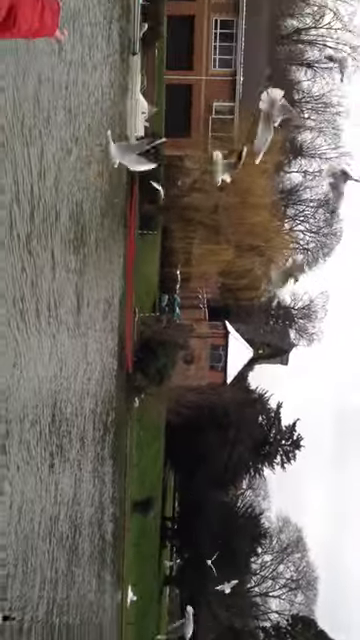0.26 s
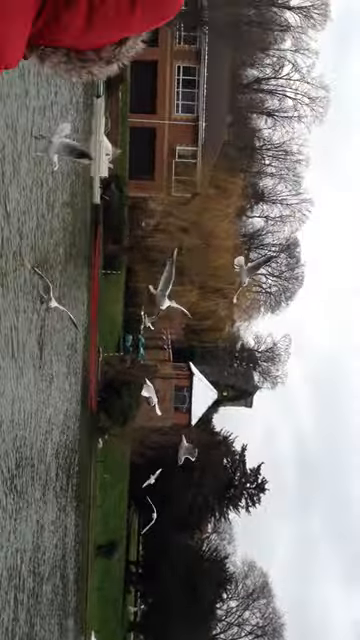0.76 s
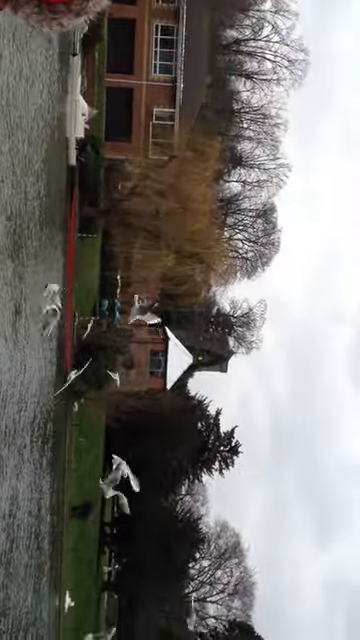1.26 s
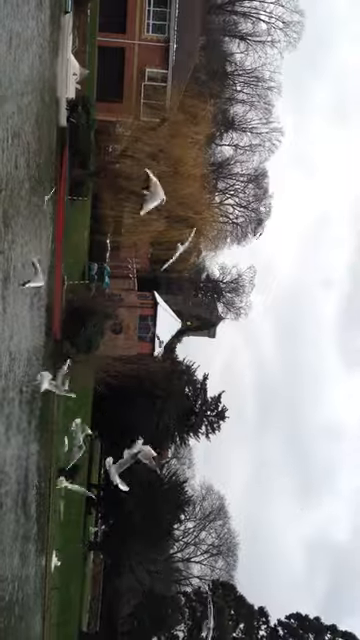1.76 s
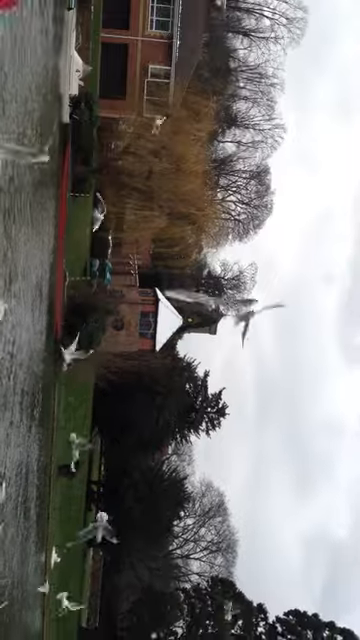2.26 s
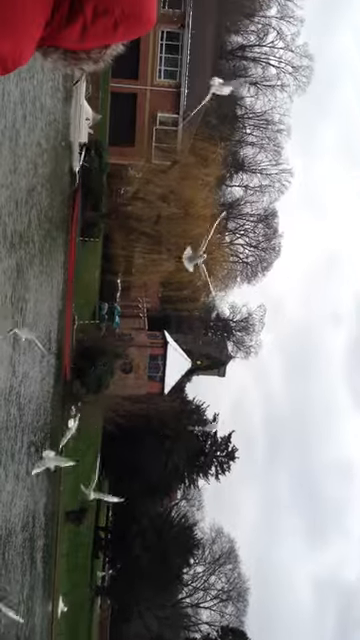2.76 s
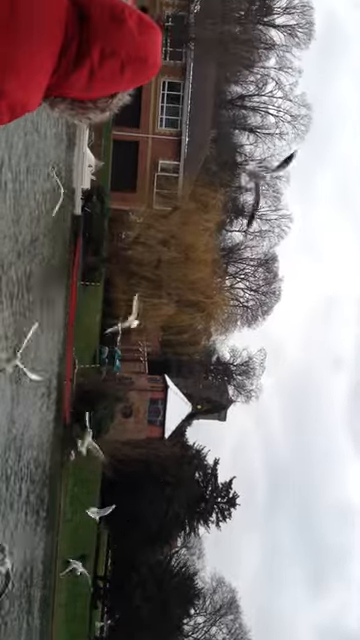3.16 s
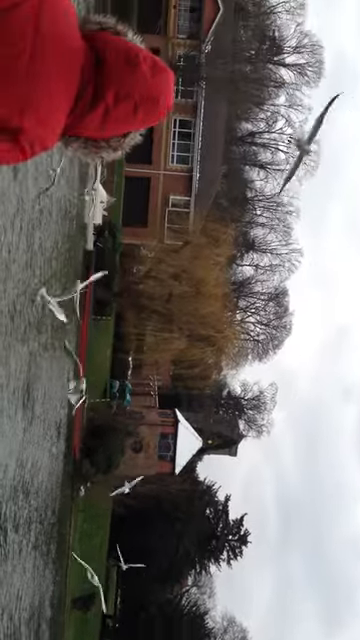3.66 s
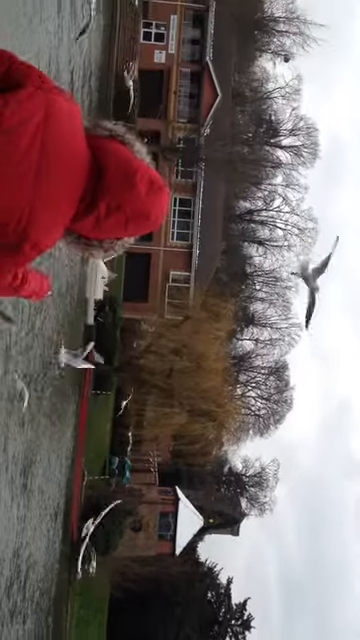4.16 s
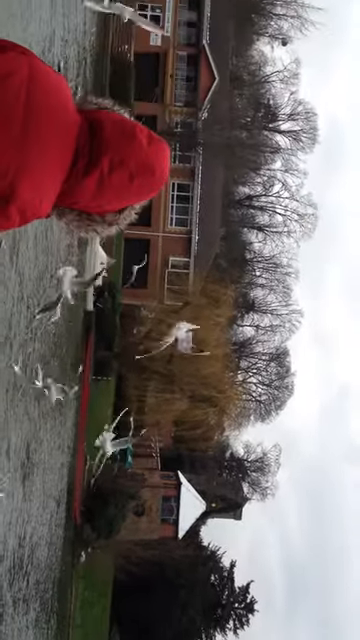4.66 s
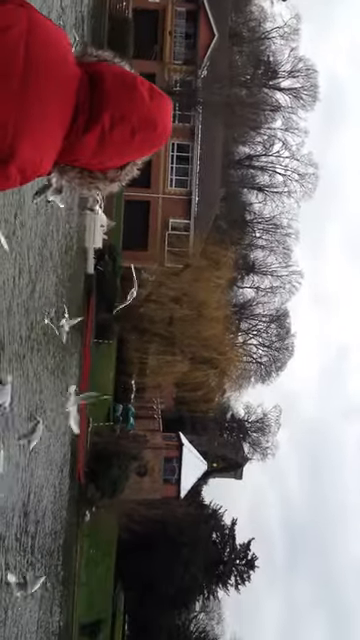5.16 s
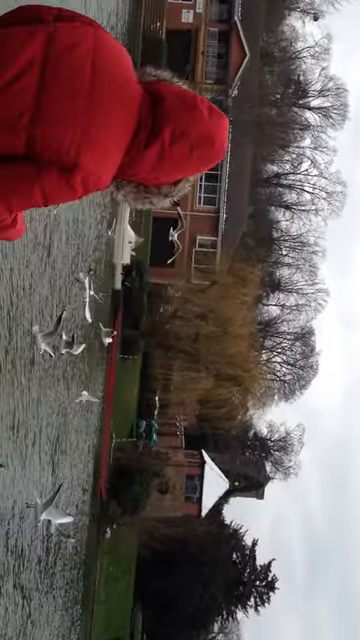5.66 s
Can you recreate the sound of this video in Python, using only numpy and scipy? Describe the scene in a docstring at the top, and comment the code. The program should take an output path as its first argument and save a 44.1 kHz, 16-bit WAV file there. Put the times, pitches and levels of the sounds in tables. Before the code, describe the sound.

Gulls call close to a small microphone beside a lake, their short cries clear or rasping, often trilled and overlapping. Wind rumbles and thumps on the microphone at the start, with a brief hiss and a few faint ticks, then returns in lighter gusts. From about halfway the calls crowd together and a few flip into high screams. Farther gulls and a soft outdoor wash lie behind.

```python
"""Gulls cry close by as a flock wheels over a lake, and a gusty breeze buffets a small microphone.
Each cry follows the source-filter principle: an arched train of syrinx pulses, clear or rasping and
often chopped by a fast trill, rings in the windpipe and beak. A few cries flip up into high screams.
The wind is turbulence at the microphone port, rumbling in gusts and thumping in single eddies.
Behind lie farther gulls, a faint echo from the bank, a soft wash and, early on, a hiss and a few ticks."""
import sys
import numpy as np
from scipy import signal
from scipy.fft import rfft, irfft
from scipy.io import wavfile
from scipy.ndimage import map_coordinates

SR = 44100
rng = np.random.default_rng(int(sys.argv[2]) if len(sys.argv) > 2 else 0)


def transcribe(u):
    """Save the signal u as a 16-bit wav file named by the first command-line argument.

    u: samples, shape (n,) or (channels, n), limited to [-1, 1]; the rate is SR.
    q: integer samples, one column per channel.
    """
    v = np.clip(np.atleast_2d(u).T, -1, 1)
    q = np.round(v * 32767).astype(np.int16)
    wavfile.write(sys.argv[1], SR, q)


N = 261411


def gain_of(db):
    """Amplitude ratio: a factor of ten for every 20 dB."""
    return 10 ** (np.asarray(db) / 20)


def unit_rms(x):
    """Normalisation to an rms of one."""
    return x / np.sqrt(np.mean(x ** 2) + 1e-20)


def value_at(points, hz):
    """Interpolation on a log-frequency axis."""
    frequencies, values = np.transpose(points)
    return np.interp(np.log(hz + 1), np.log(frequencies + 1), values)


def add(mix, start_s, sound):
    """Superposition: a sound joins the mix at its start time."""
    part = mix[max(round(start_s * SR), 0):][:len(sound)]
    part += sound[:len(part)]


def noise(spectrum):
    """Spectral shaping: white noise takes on a colour, at unit rms."""
    gains = gain_of(value_at(spectrum, np.fft.rfftfreq(N, 1 / SR)))
    return unit_rms(irfft(rfft(rng.standard_normal(N)) * gains, N))


def wander(length, rate_hz):
    """Random modulation: a continuous drift of about unit size."""
    steps = rng.standard_normal(4096)
    return np.interp(np.arange(length) * rate_hz / SR, np.arange(len(steps)), steps)


def hold(start, length, rise_s, fall_s):
    """An envelope of linear attack, sustain and exponential decay."""
    t = np.arange(N) / SR - start
    return np.clip(t / rise_s, 0, 1) * np.exp(-np.maximum(t - length, 0) / fall_s)


def resonate(x, hz, width_hz):
    """A damped resonance of unit gain whose centre follows the curve hz."""
    carrier = np.exp(2j * np.pi * np.cumsum(hz) / SR)
    pole = np.exp(-np.pi * width_hz / SR)
    return 2 * (carrier * signal.lfilter([1 - pole], [1, -pole], x / carrier)).real


# The spectrum of the wash. Each row: frequency in Hz, relative level in dB.
WASH_SPECTRUM = [(250, -36), (420, 3.5), (600, 4), (1050, 3), (1600, -3.5), (2500, -11.5), (3600, -12),
                 (5000, -16), (7500, -15), (10000, -22), (12500, -15), (15500, -20)]


def lakeside_wash(level_db=-52.7):
    """Amplitude-modulated noise: the soft, wavering wash of the open lakeside."""
    return gain_of(level_db + 3.7 * wander(N, 25)) * noise(WASH_SPECTRUM)


# The spectrum of the hiss. Each row: frequency in Hz, relative level in dB.
HISS_SPECTRUM = [(500, 6), (1500, -9), (4000, 0), (7000, 4.5), (10000, 0), (12500, 3.5), (15500, 0.5)]


def early_hiss(level_db=-42.5, fade_db_per_s=15):
    """Exponential decay: a bright, flickering hiss fades slowly, then dies quickly."""
    fading = gain_of(level_db - fade_db_per_s * np.arange(N) / SR + 2.2 * wander(N, 250))
    return fading * hold(0, length=.755, rise_s=1 / SR, fall_s=.063) * noise(HISS_SPECTRUM)


# Faint sharp ticks. Each row: start in seconds, initial level in dB.
TICK_EVENTS = [(0.148, -30), (0.208, -37), (0.319, -33)]


def ticks(decay_s=.00086):
    """Broadband transients: very short bursts of noise are heard as ticks."""
    out = np.zeros(N)
    t = np.arange(SR // 50) / SR
    for start, db in TICK_EVENTS:
        add(out, start, gain_of(db) * rng.standard_normal(len(t)) * np.exp(-t / decay_s))
    return out


# The spectrum of the turbulence. Each row: frequency in Hz, relative level in dB.
RUMBLE_SPECTRUM = [(20, -58), (40, -28), (70, -15), (100, -6.5), (140, 2), (190, -1), (250, -2.5),
                   (330, -12), (450, -20.5), (700, -31), (1500, -86)]
# Gusts of wind. Each row: start in seconds, length in seconds, level in dB.
WIND_GUSTS = [(0, 0.81, -36), (1.295, 0.11, -46), (1.694, 0.13, -42), (2.353, 0.67, -40.5),
              (3.773, 0.089, -37), (5.327, 0.27, -36), (5.692, 0.29, -37.5)]


def turbulence(breeze_db=-42.5, lumps_db=3.7):
    """Turbulent pressure at the microphone: a lumpy rumble in which breeze and gusts add in power."""
    gusts = [gain_of(db) * hold(start, length, rise_s=.0052, fall_s=.045)
             for start, length, db in WIND_GUSTS]
    strength = np.sqrt(gain_of(breeze_db) ** 2 + np.sum(np.square(gusts), 0))
    return strength * unit_rms(noise(RUMBLE_SPECTRUM) * gain_of(lumps_db * wander(N, 60)))


# Single eddies that strike the microphone. Each row: start in seconds, relative peak level in dB.
EDDY_STRIKES = [(0.117, -20.5), (0.164, -27), (0.281, -24), (0.342, -24.5), (0.422, -22), (0.469, -21),
                (0.57, -24.5), (0.613, -22.5), (0.643, -22), (0.724, -29.5), (2.471, -29), (2.683, -29),
                (2.843, -27.5), (2.939, -27.5), (3.03, -24), (3.066, -19.5), (4.279, -28), (5.155, -29),
                (5.501, -25.5)]


def eddies(thump_hz=184.4, puff_hz=289, puff_width_hz=176, rise_s=.0057):
    """Damped oscillation: each eddy thumps for a few cycles, with a softer puff of air."""
    out = np.zeros(N)
    t = np.arange(SR // 10) / SR
    swell = t / rise_s * np.exp(1 - t / rise_s)
    centre_hz = np.full(len(t), puff_hz)
    for (start, db), phase in zip(EDDY_STRIKES, rng.random(len(EDDY_STRIKES))):
        band = resonate(rng.standard_normal(len(t)), centre_hz, puff_width_hz)
        puff = unit_rms(resonate(band, centre_hz, puff_width_hz))
        thump = np.sin(2 * np.pi * (thump_hz * t + phase))
        add(out, start, gain_of(db - 3) * swell * (thump + gain_of(-9) * puff))
    return out


def microphone_port(pressure, cutoff_hz=52):
    """High-pass filtering: the small port passes no deep bass."""
    return signal.lfilter(*signal.butter(2, cutoff_hz, "high", fs=SR), pressure)


# The decay of the echo. Each row: frequency in Hz, time to fall by 60 dB in seconds.
ECHO_DECAY = [(300, 0.094), (3000, 0.66), (8000, 0.39), (16000, 0.014)]


def bank_echo(x, returns_per_s=2000, path_drift_s=.00016):
    """Scattering from water, walls and trees: many decaying returns, blurred by shifting paths."""
    returns = rng.standard_normal(SR) * (rng.random(SR) < returns_per_s / SR)
    hz, t, spectra = signal.stft(returns, SR, nperseg=256)
    decay = gain_of(-60 * t / value_at(ECHO_DECAY, hz)[:, None])
    tail = signal.istft(spectra * decay, SR, nperseg=256)[1]
    echo = signal.fftconvolve(x, tail / np.linalg.norm(tail))[:N]
    return map_coordinates(echo, [np.arange(N) + path_drift_s * SR * wander(N, 220)])


def side_paths(x, depth, count=4):
    """Comb filtering: short side paths make peaks and notches that shift as the bird flies."""
    n = np.arange(len(x))
    delays = [s * SR * (1 + .035 * wander(len(x), 30)) for s in rng.uniform(.0004, .0025, count)]
    return x + depth * sum((-1) ** k * map_coordinates(x, [n - d]) for k, d in enumerate(delays))


# The response of windpipe and beak. Each row: frequency in Hz, relative gain in dB.
THROAT_RESPONSE = [(410, -83), (700, -5.5), (1090, -15.5), (1250, -9), (1630, -1), (2160, -4.5),
                   (2590, -8.5), (3230, -4), (3540, -5), (4240, -3.5), (5220, -12), (7500, -17),
                   (9850, -28.5), (12900, -23), (15500, -32)]


def throat(x, brightness_db, size=1024):
    """Minimum-phase filtering by windpipe and beak; a gull facing the microphone sounds brighter."""
    hz = abs(np.fft.fftfreq(size, 1 / SR))
    octaves_up = np.log2(np.maximum(hz, 1000) / 1000)
    db = np.maximum(value_at(THROAT_RESPONSE, hz), -50) + brightness_db * octaves_up
    log_response = np.conj(signal.hilbert(np.log(gain_of(db))))
    ring = np.fft.ifft(np.exp(log_response)).real
    return signal.fftconvolve(x, ring)[:len(x)]


def syrinx(hz, rough, jitter=.2, shimmer=.45, doubling=.054):
    """A pulse source, one pulse a cycle; roughness adds jitter, shimmer, period doubling and breath."""
    late, uneven, air = rng.standard_normal((3, 16384))
    cycles = np.cumsum(hz) / SR
    k = np.arange(1, int(cycles[-1]) + 1)
    onsets = np.interp(k, cycles, np.arange(len(hz)))
    pulse_rough = rough[onsets.astype(int)]
    shake = .005 + jitter * pulse_rough ** 2  # even a clear cry has blurred top overtones
    onsets += shake * late[k] * SR / hz.mean()
    height = (1 + shimmer * pulse_rough * uneven[k]) * (1 + doubling * pulse_rough * (-1) ** k)
    nearby = onsets.astype(int)[:, None] + np.arange(-8, 9)
    shapes = height[:, None] * np.sinc(nearby - onsets[:, None])
    pulses = np.zeros(len(hz))
    np.add.at(pulses, np.clip(nearby, 0, len(hz) - 1), shapes)
    puffs = unit_rms(air[:len(hz)] * (1 + np.exp(-(cycles % 1) / .18)))
    return unit_rms(pulses) + (.04 + .6 * rough) * puffs


def cry(crest, length, db, pitch_hz, climb, fall, rough_start, rough_end,
        trill, trill_hz, brightness_db, beak_hz, beak_db):
    """Source and filter: pitch and beak glide together as effort swells; a trill chops the voice."""
    start = crest - .46 * length
    t = np.arange(start, start + length, 1 / SR)
    n = len(t)
    arch = np.interp(t, [start, crest, start + length], [-1, 0, 1])
    beats = trill_hz * (t - crest) + .3 * arch * wander(n, 60)
    gap = np.clip(trill * (1 + .3 * wander(n, 70)), 0, .97) * np.sin(np.pi * beats) ** 4
    taper = min(np.sqrt(.135 / length), 1.5)  # longer cries have flatter tops
    swell = (np.cos(np.pi * arch / 2) + 1e-9) ** taper
    effort = swell * (1 - gap) * gain_of(1.2 * wander(n, 140))
    rough = np.interp(arch, [-1, 1], [rough_start, rough_end])
    rough = np.clip(rough + .16 * arch ** 4, 0, 1)  # rougher at both ends
    bend = 2.4 if climb * fall > 0 else 1  # a cry that only rises or only falls slides straight
    glide = 1 - np.where(arch < 0, climb, fall) * abs(arch) ** bend
    waver = (.0034 + .0441 * rough) * wander(n, 246.1)
    drift = 1 + .055 * rough ** 1.577 * wander(n, 54.63)
    hz = pitch_hz * glide * (1 - .0733 * gap + waver) * drift  # pitch sags between beats
    voice = throat(syrinx(hz, rough), brightness_db)
    voice = side_paths(voice, depth=.1 + .45 * rough.mean())
    beak_drift = 1 + .21 * rough ** 2 * wander(n, 71.5)
    beak = resonate(voice, beak_hz * glide * beak_drift, width_hz=270)
    voice = unit_rms(voice + (gain_of(beak_db) - 1) * beak)
    # A softly driven syrinx closes gently, so the cry is dull at its edges and between beats.
    mellow = signal.filtfilt(*signal.butter(2, 4600, fs=SR), voice)
    sharpness = np.clip(effort, 0, 1) ** .63
    return start, gain_of(db) * effort * (sharpness * voice + (1 - sharpness) * mellow)


def far_gulls(cries_per_s=5, level_db=-60):
    """Attenuation with distance: the rest of the flock is faint and dull, crying hoarsely at random."""
    out = np.zeros(N)
    for when, length, pitch, beak, loud in rng.random((int(cries_per_s * N / SR), 5)):
        add(out, *cry(when * N / SR, length=.067 + .11 * length, db=level_db + 4 * (loud - .5),
                      pitch_hz=750 + 400 * pitch, climb=.149, fall=.333,
                      rough_start=.57, rough_end=.62, trill=.516, trill_hz=74,
                      brightness_db=-6.5, beak_hz=1700 + 2000 * beak, beak_db=5))
    return out


# High screams. Each row: brightness in dB per octave, then a list of points.
# Each point: time in seconds, pitch in Hz, level in dB, how far the voice breaks from 0 to 1.
SCREAM_CONTOURS = [ (10, [(3.135, 2930, -46, .3), (3.178, 3010, -27.5, .1), (3.22, 2970, -39, .4),
                   (3.25, 2890, -34, .3), (3.27, 2420, -32.5, .7), (3.295, 2150, -42, 1)]),
                   (3, [(3.305, 2364, -39, 0.7), (3.325, 2553, -34, 0.5), (3.345, 2470, -31, 0.3),
                   (3.355, 2400, -48, 0.5)]), (-3, [(3.785, 3250, -40, 0.5), (3.795, 3140, -29.5, 0),
                   (3.803, 2980, -36, .02), (3.819, 3140, -32.5, 0.24), (3.83, 2870, -58, .3)]),
                   (1, [(4.195, 2600, -52, 0.3), (4.213, 2650, -47, .2), (4.228, 2710, -39.5, 0),
                   (4.243, 2590, -48, 0.4), (4.262, 2560, -39, .6)])]


def screams(break_hz=99, flutter_db=4.5, breathiness=.29):
    """Nonlinear vibration: a hoarse whistle breaks into chopped steps and gains a half-order tone."""
    out = np.zeros(N)
    for brightness_db, contour in SCREAM_CONTOURS:
        when, pitch, level, breaking = np.transpose(contour)
        t = np.arange(when[0], when[-1], 1 / SR)
        n = len(t)
        broken = np.clip(np.interp(t, when, breaking), 0, 1)
        beats = break_hz * (t - t[-1])
        stepped_time = t + broken * (np.floor(beats) + .5 - beats) / break_hz
        rasp = (.11 + .3 * broken) * wander(n, 2200)
        hz = np.interp(stepped_time, when, pitch) * (1 + (.008 + .03 * broken) * wander(n, 260))
        phase = 2 * np.pi * np.cumsum(hz) / SR + rasp
        tones = sum(np.cos(k * phase) / k for k in range(1, 4)) + .6 * broken * np.cos(1.5 * phase)
        source = unit_rms(tones) + breathiness * rng.standard_normal(n)
        voice = unit_rms(throat(source, brightness_db))
        effort = signal.windows.tukey(n, .1) * (1 - .8 * broken * np.cos(np.pi * beats) ** 4)
        db = np.interp(t, when, level) + flutter_db * wander(n, 145)
        add(out, when[0], effort * gain_of(db) * voice)
    return out


# Close cries, or loud beats within a cry. Each row: crest time in seconds, length in seconds,
# level in dB, pitch in Hz, climb before the crest and fall after it as shares of the pitch (negative
# for the other way), roughness at the start and at the end from 0 to 1, trill depth from 0 to 1,
# trill rate in Hz, brightness in dB per octave, beak resonance in Hz, its boost in dB.
NEAR_CRIES = [ (.08, 0.059, -25.5, 993, 0.17, -0.0044, 0.64, 0.37, 0.0083, 85, 4.5, 2810, 13),
              (.096, 0.019, -24.5, 949, -.03, 0.12, .02, .02, 0, 85, 1.5, 2880, 11),
              (.108, 0.032, -35, 789, -0.13, 0.11, 0.42, 0.37, 0.24, 85, 7, 1550, 4.4),
              (.432, .085, -27.5, 1010, .25, .25, .15, .35, .8, 88, 3.5, 3050, 8),
              (.595, .054, -47.5, 773, .14, 0.079, 0.62, 0.42, 0.055, 76, 1.5, 2600, 13),
              (.775, 0.074, -36.5, 1126, 0.039, .38, 0.44, 0.51, 0.24, 76, 0.5, 2090, 3.4),
              (.97, 0.072, -24.5, 1093, .25, -0.022, 0.61, .02, 0.083, 87, 0.5, 3240, 6.5),
              (.982, .014, -26, 1070, 0.05, 0.15, .05, .05, 0, 87, 4, 3220, 9.3),
              (.994, 0.049, -28, 1025, -0.076, 0.2, .02, 0.45, 0.65, 87, 2, 3090, 6),
              (1.039, .021, -23.5, 1030, .1, .17, .1, .14, 0, 76, 1.5, 3080, 4),
              (1.061, 0.033, -38.5, 748, -0.19, 0.17, 0.65, .55, 0.25, 76, 4, 1480, 14),
              (1.117, 0.25, -36, 1052, 0.14, 0.0072, 0.3, 0.51, 0.4, 76, 3, 1090, 21.4),
              (1.206, 0.082, -33.5, 1078, 0.049, -0.041, 0.32, 0.8, 0.37, 76, 6.5, 3180, 18),
              (1.23, 0.047, -29.5, 975, 0.0098, 0.3, 0.34, 0.44, 0.23, 85, 0.5, 1770, 3.5),
              (1.265, .09, -42, 830, -.1, .16, .75, .8, .75, 72, -3, 1650, 10),
              (1.352, 0.066, -33.5, 980, 0.16, 0.35, 0.21, .25, 0.57, 70, 1, 2870, 9.1),
              (1.443, 0.073, -44, 776, .14, 0.41, 0.24, 0.56, 0.28, 76, -5, 1530, 6.2),
              (1.513, 0.053, -48, 895, 0.23, 0.19, 0.64, 0.59, 0, 76, -5, 2700, 5.5),
              (1.556, 0.078, -35, 1055, .13, 0.099, 0.45, 0.57, 0.43, 76, 3, 3430, 4.7),
              (1.686, .074, -23.5, 1135, .05, .32, .08, .2, .2, 76, .5, 3380, 8),
              (1.801, 0.058, -41, 806, 0.15, 0.37, 0.52, 0.51, 0.42, 76, 0, 3500, 6),
              (2.041, .24, -39, 1089, 0.065, .16, 0.7, 0.76, 0.056, 76, 2.5, 3400, 8.9),
              (2.362, 0.074, -35, 747, .09, .36, 0.43, .5, 0.15, 76, 3.5, 2220, 6.8),
              (2.755, .07, -49, 830, .12, .15, .35, .4, .2, 76, -4, 2500, 14),
              (2.885, 0.063, -33.5, 642, 0.16, 0.084, 0.42, 0.54, 0.013, 76, 4.5, 3200, 5),
              (3.113, 0.13, -31, 1091, 0.22, 0.17, 0.83, 0.62, 0, 76, 3.5, 3580, 4.7),
              (3.195, .2, -35, 1115, .06, .12, .6, .65, .3, 76, 3.5, 4200, 8),
              (3.277, .04, -34, 1190, -.08, .14, .2, .3, .7, 90, .5, 3560, 8),
              (3.348, 0.019, -33, 1220, 0.09, 0.3, 0.37, 0.34, 0.3, 76, 3, 3160, 15),
              (3.366, 0.22, -39, 1001, -0.074, 0.25, 0.57, 0.57, 0.091, 76, 3.5, 2040, 3.8),
              (3.471, .072, -28, 590, .2, .18, .25, .3, .3, 76, 3, 3540, 6),
              (3.585, 0.077, -34, 740, 0.19, -0.16, 0.083, 0.45, 0.21, 76, 4, 3600, 3.6),
              (3.619, 0.079, -31, 1119, 0.15, 0.22, 0.57, 0.7, 0.25, 76, 3, 3500, 12),
              (3.69, 0.068, -33.5, 990, -0.0035, 0.22, .25, 0.56, 0.67, 70, 4.5, 4950, 11),
              (3.757, 0.097, -34, 1080, 0.11, -0.012, 0.71, 0.26, 0.022, 76, 1, 2200, 5.3),
              (3.782, 0.064, -32, 1090, 0.11, 0.17, 0.88, 0.54, 0.23, 76, 2.5, 3860, 9.6),
              (3.835, 0.037, -44.5, 970, -0.11, 0.12, .6, 0.71, 0, 76, 0.5, 2090, 6.8),
              (3.881, 0.12, -40, 1056, 0.14, 0.11, 0.83, 0.89, 0.29, 76, 4, 4300, 3.1),
              (3.949, 0.074, -36.5, 1095, 0.13, 0.27, 0.54, 0.57, 0.14, 76, -1, 3300, 8.1),
              (4.084, 0.07, -32.5, 776, 0.18, -.06, .03, 0.66, 0.22, 76, 4.5, 3940, 7.8),
              (4.107, 0.066, -37, 954, -0.087, 0.037, 0.62, 0.64, 0.37, 76, 3, 1880, 3.5),
              (4.145, 0.038, -36, 994, 0.15, .1, 0.49, .3, 0.03, 76, 1, 2000, 3.7),
              (4.159, 0.053, -35.5, 977, 0.1, 0.5, .3, 0.48, 1, 76, 2.5, 2920, 4.8),
              (4.243, 0.067, -42, 1282, 0.15, 0.17, 0.42, 0.44, 0.32, 76, 3, 3900, 4.7),
              (4.269, 0.021, -23, 1058, 0.086, 0.068, 0.37, 0.2, 0, 90, 0, 3150, 9.6),
              (4.281, 0.017, -24, 1059, 0.041, -0.05, .1, 0.17, 0.23, 90, -0.5, 3180, 5),
              (4.292, 0.019, -26, 1150, -0.0056, -0.014, .15, .15, 0, 90, 1.5, 2280, 4),
              (4.301, 0.023, -24, 1067, -0.0032, 0.14, .1, 0.49, 0, 90, 0.5, 2110, 4.7),
              (4.33, 0.066, -31, 1182, .16, .3, 0.38, 0.48, 0.5, 90, 2, 3630, 4.1),
              (4.543, 0.07, -47, 668, 0.14, 0.36, 0.644, 0.68, 0, 76, -4.5, 2000, 5.4),
              (4.664, 0.061, -35, 1054, .13, 0.065, .35, 0.47, 0.82, 76, -0.5, 3100, 2),
              (4.694, .066, -32.5, 866, .09, .24, .4, .5, .7, 72, 3, 2460, 6),
              (4.737, 0.066, -32, 965, -0.067, 0.0078, .2, 0.19, 0, 76, 4, 3840, 8.4),
              (4.757, 0.053, -38.5, 1105, 0.097, 0.48, 0.51, 0.65, 0.34, 76, 1.5, 4000, 6.6),
              (4.817, .1, -35, 778, .1, -.12, .55, .65, .58, 66, 1, 2120, 8),
              (4.873, .07, -38, 756, .1, -.08, .55, .6, .5, 72, -1.5, 2300, 8),
              (4.926, 0.075, -29, 1016, 0.13, 0.29, 0.43, 0.38, 0.29, 72, 3.5, 3980, 10),
              (4.941, 0.024, -21.5, 1100, 0.066, 0.1, 0.09, .1, 0, 75, 0, 3340, 7.6),
              (4.954, 0.084, -23.5, 1098, 0.11, 0.44, 0.082, 0.18, 0.81, 75, 3, 3370, 4.1),
              (4.998, 0.21, -32.5, 1157, 0.018, 0.2, 0.73, 0.71, 0.45, 70, 3, 3540, 7.8),
              (5.033, 0.015, -28, 1237, 0.11, .04, 0.28, 0.24, 0, 88, 0, 3740, 5.2),
              (5.045, 0.041, -26, 1262, 0.0074, .1, 0.2, 0.57, 0.63, 88, 3.5, 4180, 6.9),
              (5.168, 0.069, -34.5, 954, .2, -0.11, 0.27, 0.22, 0, 76, 5.5, 3940, 9),
              (5.185, 0.023, -26.5, 983, 0.073, -0.021, .04, .04, 0.15, 64, 6, 4080, 11),
              (5.201, 0.056, -32, 1011, -0.024, 0.14, 0.21, 0.44, 0.4, 64, 2, 4100, 4.6),
              (5.395, 0.099, -30.5, 1039, 0.23, 0.36, 0.69, 0.39, 0.78, 73, 2.5, 1880, 9),
              (5.461, 0.14, -44, 685, 0.062, 0.12, 0.54, 0.72, 0.64, 70, 1, 3400, 2.8),
              (5.657, 0.057, -36.5, 799, 0.082, 0.065, 0.53, 0.51, 0.42, 76, 1.5, 2250, 6.6),
              (5.81, 0.077, -31, 770, 0.16, 0.24, 0.33, 0.47, 0.33, 70, 2.5, 2330, 7.1)]


def near_gulls(reflection_db=-16):
    """Specular reflection: the water mirrors each close cry a few milliseconds later."""
    out = np.zeros(N)
    delays_s = rng.uniform(.002, .008, len(NEAR_CRIES))
    for row, delay in zip(NEAR_CRIES, delays_s):
        start, voice = cry(*row)
        add(out, start, voice)
        add(out, start + delay, gain_of(reflection_db) * voice)
    return out


def scene():
    """Superposition of the gulls, their faint echo, the wind and the background."""
    gulls = near_gulls() + screams() + far_gulls()
    echo = gain_of(-22) * bank_echo(gulls)
    wind = microphone_port(turbulence() + eddies())
    background = lakeside_wash() + early_hiss() + ticks()
    return (gulls + echo + wind + background)[None]


def record(dry):
    """Band limiting: a steep low-pass filter removes the highest treble."""
    low_pass = signal.firwin(511, cutoff=15700, window=("kaiser", 9), fs=SR)
    return signal.oaconvolve(dry, low_pass[None], "same")


dry = scene()
out = record(dry)
transcribe(out)
```